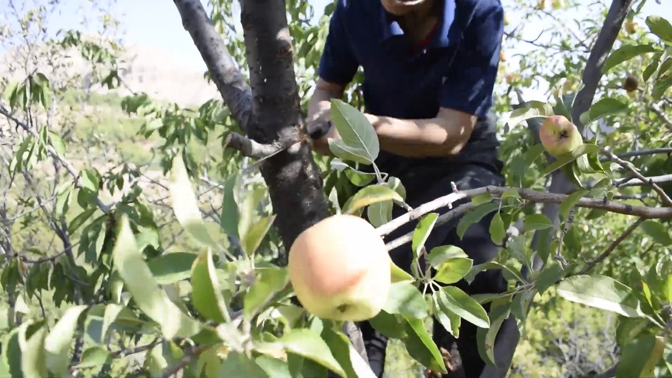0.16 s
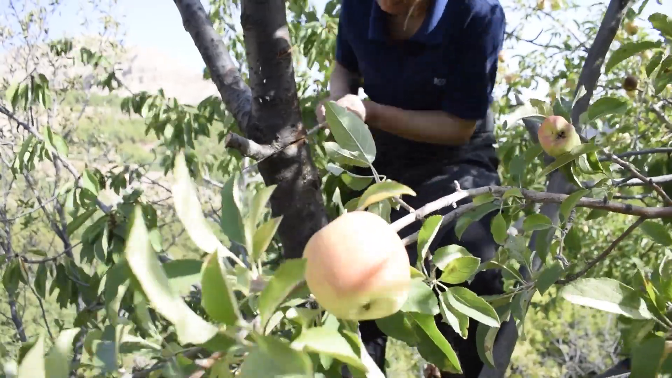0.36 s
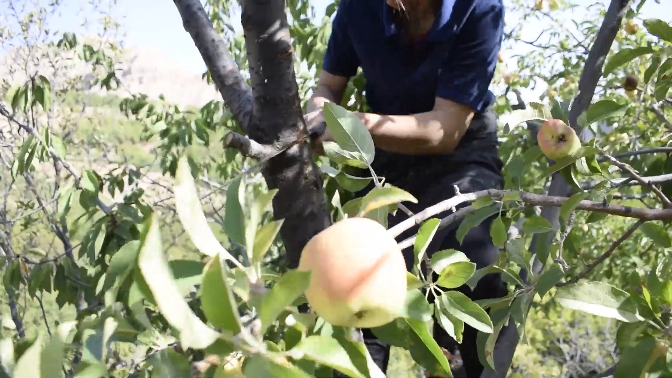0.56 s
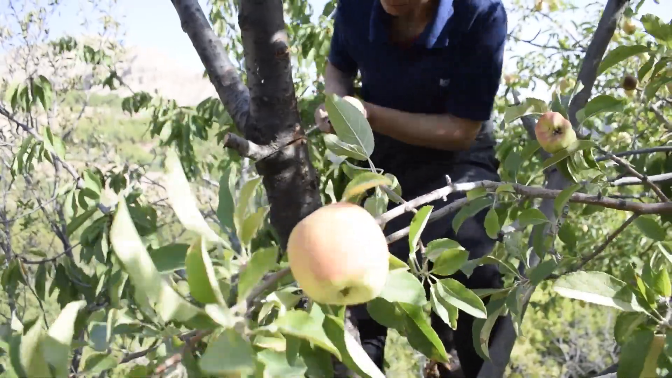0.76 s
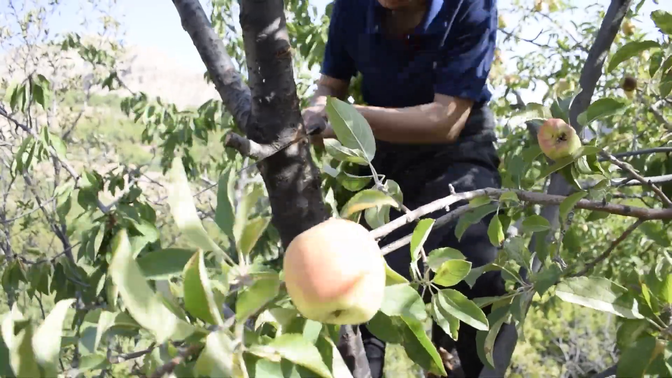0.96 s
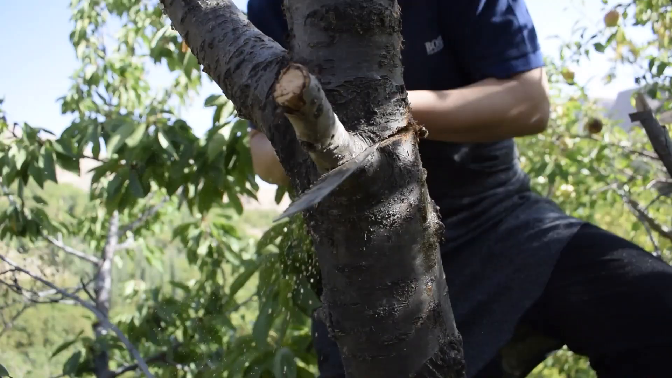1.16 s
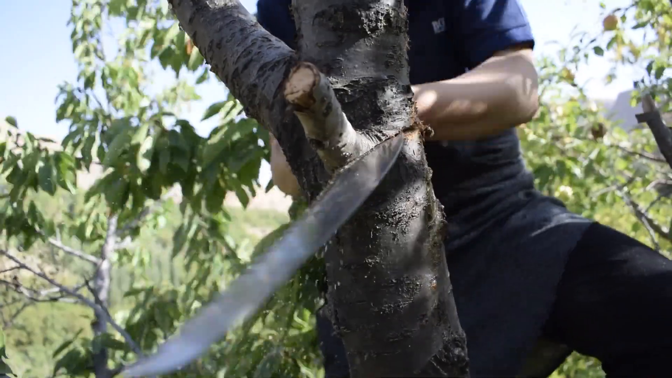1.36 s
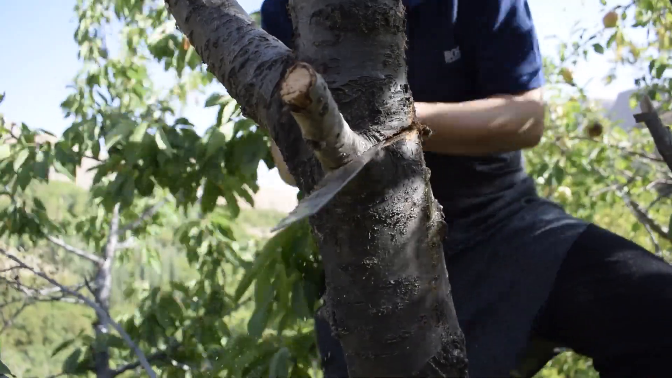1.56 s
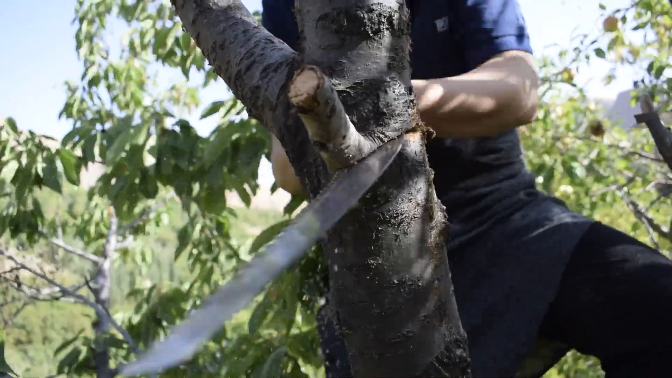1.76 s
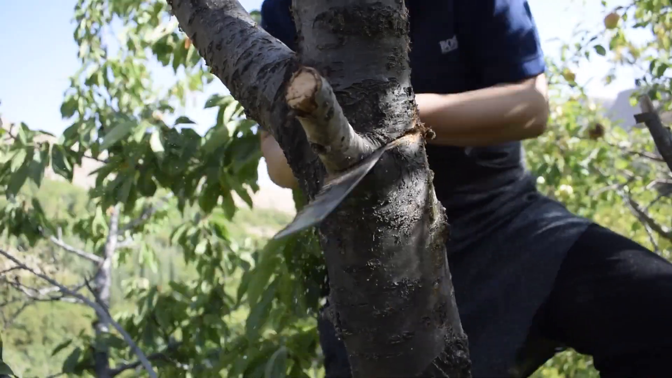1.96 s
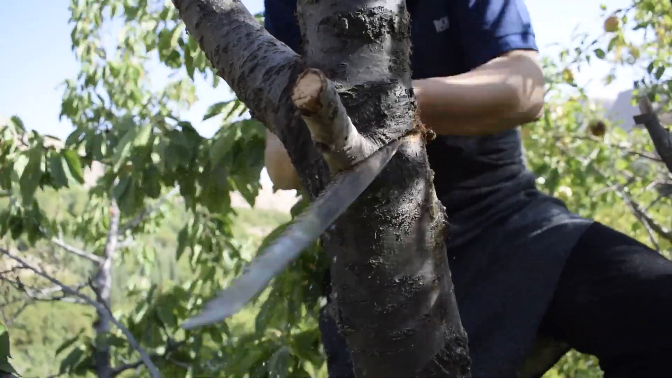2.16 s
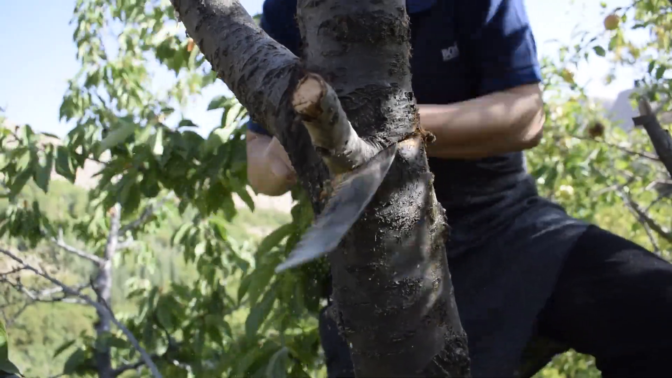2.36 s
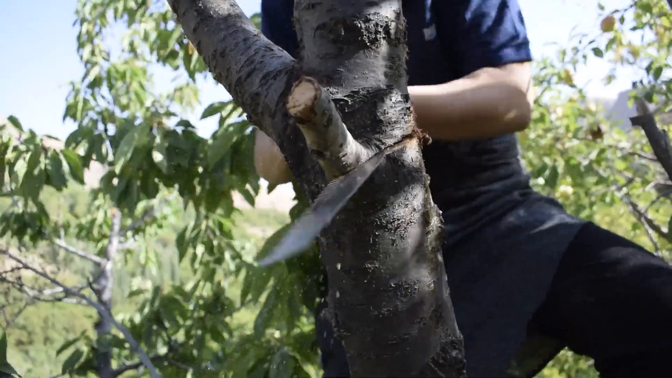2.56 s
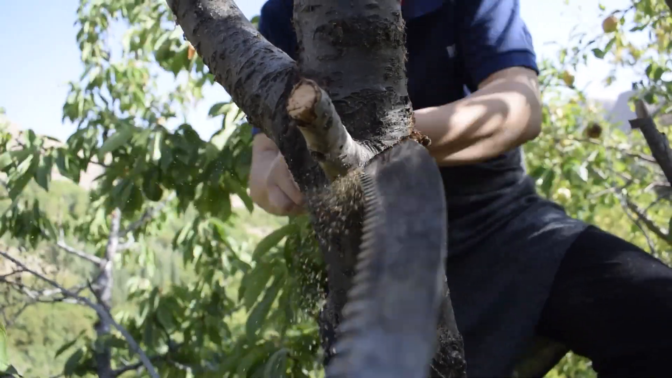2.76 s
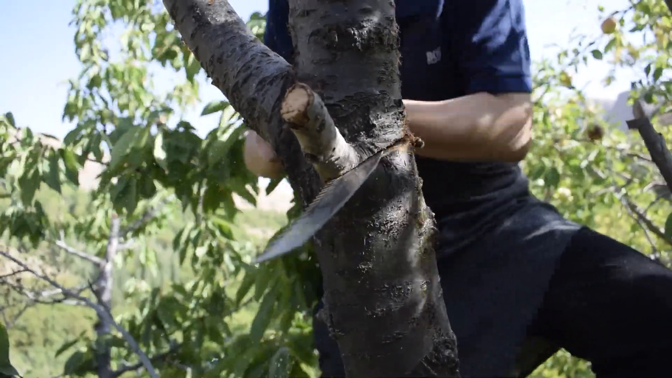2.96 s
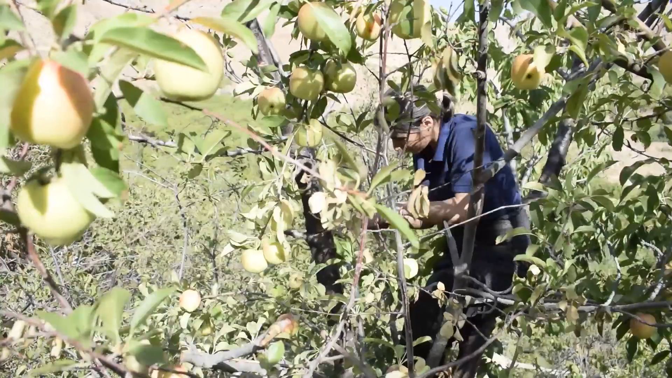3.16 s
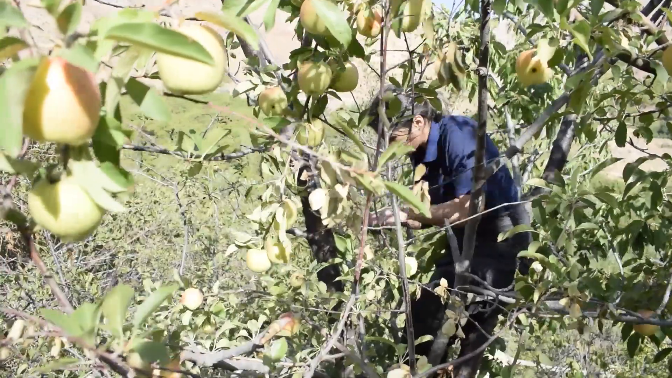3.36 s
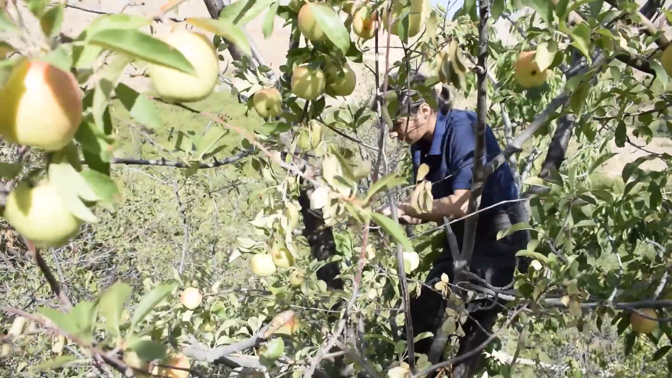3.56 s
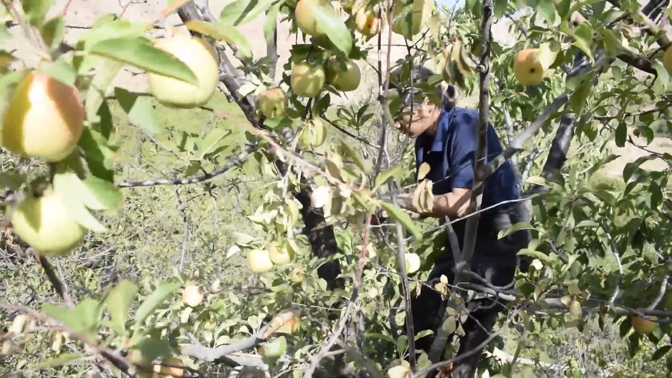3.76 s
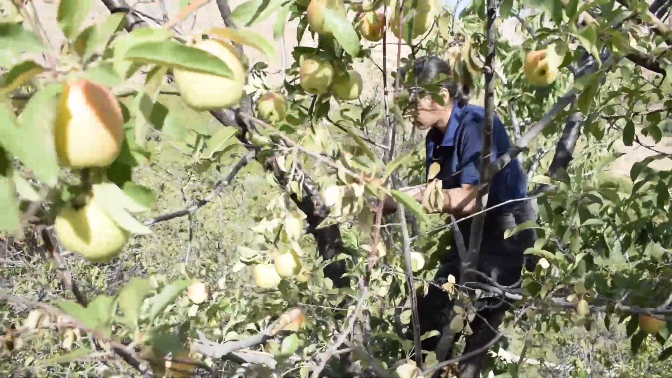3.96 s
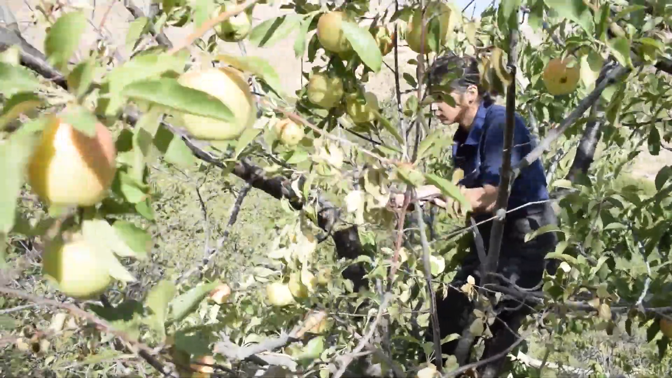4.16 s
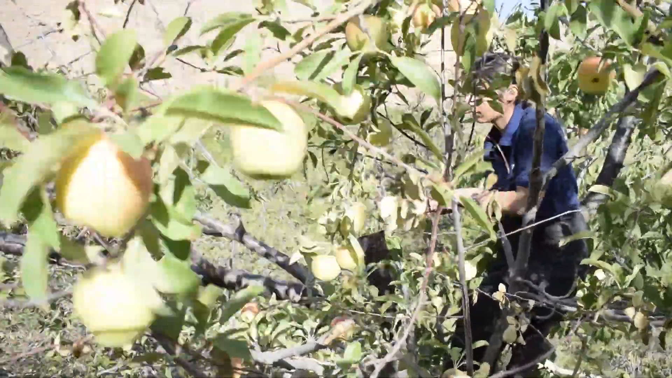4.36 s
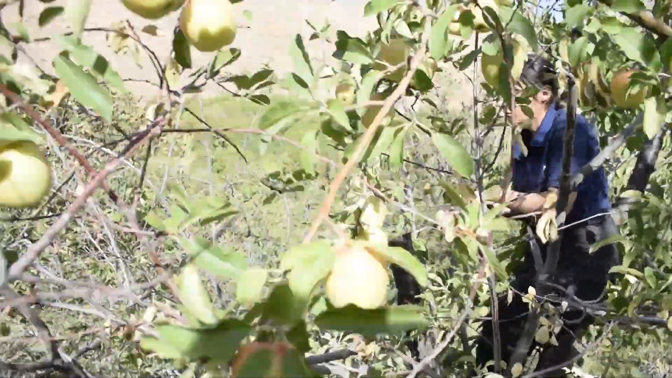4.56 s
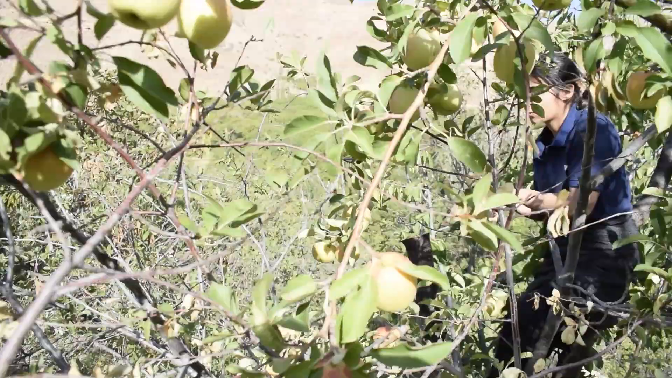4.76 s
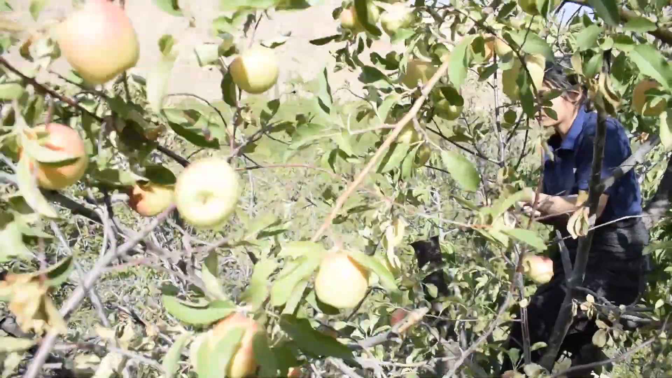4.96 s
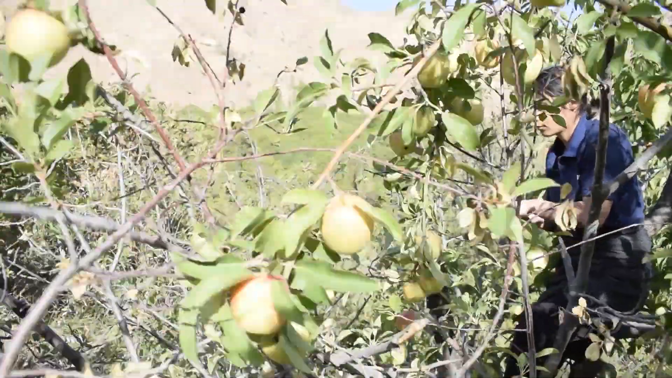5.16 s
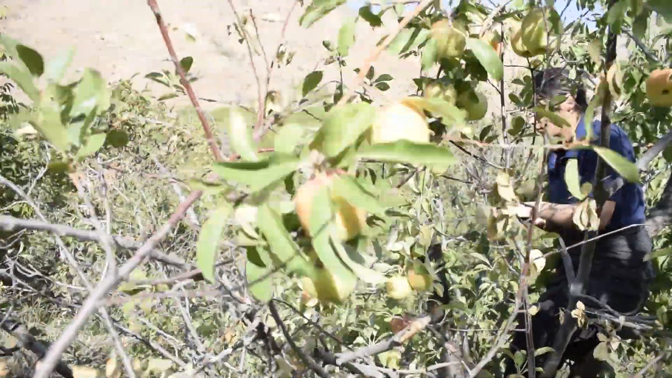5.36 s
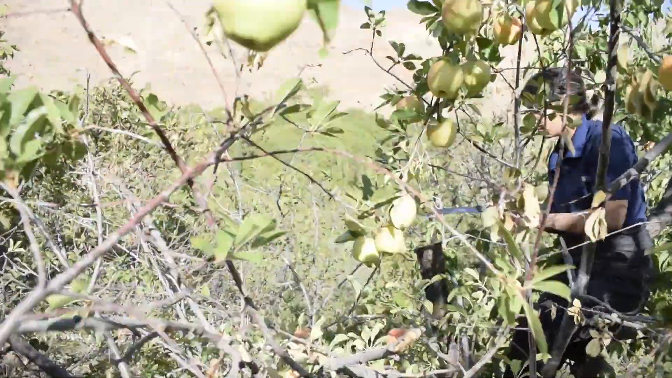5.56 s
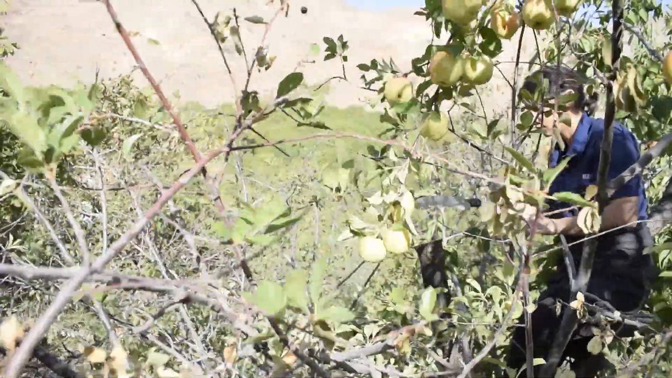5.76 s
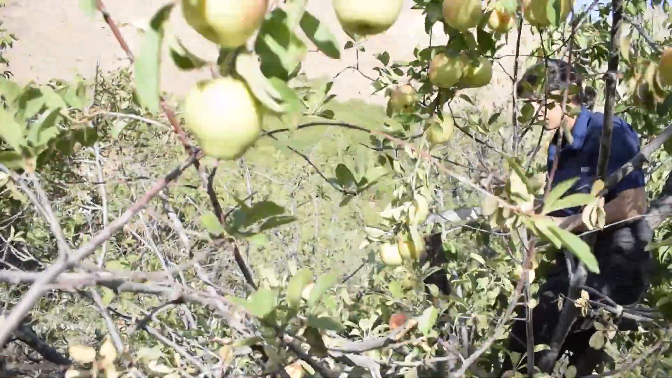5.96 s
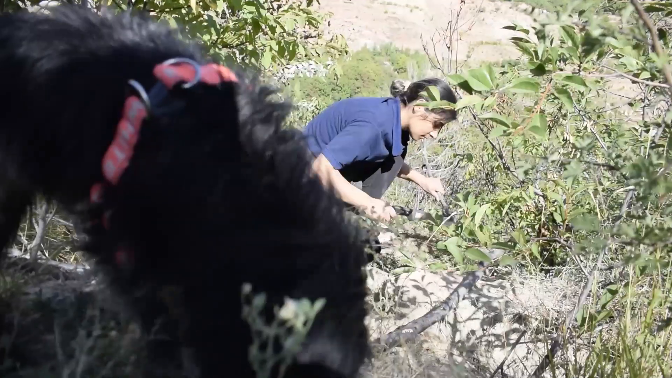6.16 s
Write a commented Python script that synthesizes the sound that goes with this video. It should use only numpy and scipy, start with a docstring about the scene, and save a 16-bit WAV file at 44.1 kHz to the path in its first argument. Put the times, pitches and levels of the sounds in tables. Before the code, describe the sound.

Outdoors in an orchard, a hand saw works close to the microphone with fast push and pull strokes, hissing and rasping over a woody limb resonance. After about three seconds the last fibres crack and tear, and the limb drops through foliage in bright, uneven waves of leaf rustle, twig snaps and scraping. The rustle dies away over a light breeze and a faint, distant engine putter.

```python
"""In an orchard, outdoors, a hand saw cuts a limb off a fruit tree in quick push and pull strokes.
Each stroke is random tooth bites and clicks of torn fibre, filtered into blade hiss, rasp and limb resonance.
Short bursts of clicks make the last fibres crack; then filtered clicks, flicks and noise rustle and scrape
as the limb sweeps down through the leaves. Noise makes a light breeze, with a faint low drone early on.
Later a slow engine putters far off: one soft puff for each firing."""
import sys
import numpy as np
from scipy import signal
from scipy.io import wavfile
from scipy.ndimage import uniform_filter1d, map_coordinates

SR = 44100
rng = np.random.default_rng(int(sys.argv[2]) if len(sys.argv) > 2 else 0)


def transcribe(signal):
    """Save signal, clipped to [-1, 1], as a 16-bit WAV file at the path in sys.argv[1]."""
    frames = np.atleast_2d(signal).T
    limited = np.clip(frames, -1, 1)
    pcm = np.round(limited * 32767).astype(np.int16)
    wavfile.write(sys.argv[1], SR, pcm)


N = 273420
TIME = np.arange(N) / SR  # seconds


def gain_of(db):
    """Turns decibels into a factor for the amplitude."""
    return 10 ** (np.asarray(db) / 20)


def evened(x):
    """Scales a sound to an average strength (rms) of 1."""
    return x / np.sqrt(np.mean(x ** 2) + 1e-20)


def add(mix, start_s, sound):
    """Mixes a sound in at its start time."""
    part = mix[max(round(start_s * SR), 0):][:len(sound)]
    part += sound[:len(part)]


def follow(rows, t):
    """Reads each column of a time curve at the times t, with straight lines between rows."""
    times, *columns = np.transpose(rows)
    return [np.interp(t, times, column) for column in columns]


def colour(x, points):
    """Filters to a given spectrum, never ahead of the input, so clicks keep their sharp fronts."""
    hz, db = np.transpose(points)
    f = abs(np.fft.fftfreq(4096, 1 / SR))
    level_db = np.interp(np.log(f + 1), np.log(hz + 1), db)
    log_gain = np.log(gain_of(level_db))
    # the phase that packs the filter's energy as early as possible
    taps = np.fft.ifft(np.exp(np.conj(signal.hilbert(log_gain)))).real
    first_half = taps[:len(taps) // 2]
    return evened(signal.oaconvolve(x, first_half)[:len(x)])


def ring(x, hz, width_hz):
    """Passes a sound through one resonance; a narrow one rings longer."""
    hz = min(hz, .45 * SR)
    width_hz = min(max(width_hz, 1), SR / 4)
    return signal.lfilter(*signal.iirpeak(hz, hz / width_hz, fs=SR), x)


def body(x, modes, size=1):
    """Adds resonances side by side, each applied twice for steep sides; size multiplies their pitch."""
    total = 0
    for hz, width_hz, db in modes:
        once = ring(x, hz * size, width_hz)
        twice = ring(once, hz * size, width_hz)
        total = total + gain_of(db) * evened(twice)
    return evened(total)


def glide(x, hz, width_hz):
    """Feeds a steep resonance that follows the pitch curve hz."""
    turn = np.exp(2j * np.pi * np.cumsum(hz) / SR)
    r = np.exp(-np.pi * width_hz / SR)
    # shift the moving pitch down to zero, smooth, and shift it back up
    smoothed = signal.lfilter([1], [1, -2 * r, r * r], x / turn)
    return evened((turn * smoothed).real)


def wander(count, hz):
    """Drifts between random values, hz of them a second, with rms 1."""
    knots = np.arange(count) * hz / SR
    values = rng.standard_normal(int(knots[-1]) + 2)
    return evened(map_coordinates(values, [knots], order=1))


def crackle(count, per_s, spread_db):
    """Scatters random clicks of either sign; a larger spread makes their strengths more unequal."""
    draw = rng.random(count) * SR / per_s
    hit = draw < 1
    luck = 2 * draw[hit] - 1
    strength = gain_of(spread_db * np.minimum(-np.log(abs(luck)), 5))
    clicks = np.zeros(count)
    clicks[hit] = np.sign(luck) * strength
    return evened(clicks)


def air():
    """A light breeze in the trees is slowly varying filtered noise; the faint low drone is a wavering sine."""
    # the breeze's spectrum: pitch_hz, level_db (relative, per Hz)
    breeze_spectrum = [(15, -40), (25, -24), (317, -6), (503, -6.5), (818, -10), (1370, -13), (1560, -13),
                       (1740, -13), (1940, -18), (4610, -15.5), (5730, -14.5), (8140, -16.5), (9070, -22.5),
                       (16000, -26.5)]
    # the breeze's loudness: time_s, level_db
    breeze_level = [(0, -43), (1.1, -44.5), (2.0, -39), (3.0, -42), (3.6, -45), (4.5, -46.5), (6.2, -48)]
    # the drone's loudness: time_s, level_db
    drone_level = [(0, -60.5), (1.1, -61.5), (1.2, -87)]
    breeze_db = follow(breeze_level, TIME)[0] + 1.04 * wander(N, 4.08)
    breeze = gain_of(breeze_db) * colour(rng.standard_normal(N), breeze_spectrum)
    drone_hz = 65 + 0.34 * wander(N, 7.7)
    drone = np.sin(2 * np.pi * np.cumsum(drone_hz) / SR)
    return breeze + gain_of(follow(drone_level, TIME)[0]) * evened(drone)


def engine():
    """Each firing of the distant engine gives one soft puff, coloured by the exhaust's resonances."""
    # the engine's course: time_s, firings_per_s, level_db
    running = [(3.18, 22.07, -53.5), (3.635, 22.4, -55), (4.1, 19.7, -47), (4.5, 23.7, -68.5),
               (5.0, 21, -56), (5.58, 23.2, -53), (6.2, 19.96, -49.5)]
    # exhaust resonances: pitch_hz, width_hz, level_db (relative)
    exhaust = [(142, 48, 2.5), (284, 83, 4), (450, 71, -0.5)]
    rate, db = follow(running, TIME)
    firings = np.cumsum(rate * (TIME > running[0][0])) / SR
    puffs = np.diff(np.ceil(firings), prepend=0) * gain_of(rng.standard_normal(N))
    breath = .25 * rng.standard_normal(N)
    return gain_of(db) * body(evened(puffs) + breath, exhaust)


def orchard(x, t60_s, wet_db):
    """Trunks and foliage scatter a short, dull tail; it fades by 60 dB in t60_s."""
    t = np.arange(SR // 2) / SR
    echoes = crackle(len(t), per_s=2500, spread_db=-3.5) * gain_of(-60 * t / t60_s) * (t > .004)
    tail = ring(echoes, 1400, 11000)
    tail = tail / np.linalg.norm(tail)
    return x + gain_of(wet_db) * signal.oaconvolve(x, tail)[:N]


def flicks(per_s, spread_db, lowest_hz, highest_hz, count=8):
    """Single leaves and twigs flick, each group with a short ring of its own pitch."""
    pitches = np.geomspace(lowest_hz, highest_hz, count)  # from broad leaves to thin tips
    # a flick is a tiny scrape, not a single click
    t = np.arange(SR // 400) / SR
    scrapes = rng.standard_normal((count, len(t))) * np.exp(-t / 0.00042)
    total = 0
    for hz, scrape in zip(pitches, scrapes):
        train = signal.oaconvolve(crackle(N, per_s / count, spread_db), scrape)[:N]
        total = total + np.sqrt(hz) * evened(ring(train, hz, 0.32 * hz))
    return evened(total)


def fall():
    """The limb falls: leaves flick past each other in clumps while twigs and boughs scrape."""
    # the fall through foliage: time_s, leaf_rustle_db, twig_scrape_db, bough_rubbing_db
    falling = [(3.765, -52, -47, -55), (3.8, -27.5, -30.0, -40.0), (3.865, -43, -32, -38.5),
               (3.9, -61, -33.0, -35), (4.05, -36, -37, -44), (4.3, -24, -26.5, -39),
               (4.47, -22.5, -25.5, -44), (4.61, -31, -36, -61), (4.68, -24, -29, -40),
               (4.77, -36.0, -34, -46.5), (4.81, -20, -28, -42), (4.94, -29, -30.5, -41),
               (5.01, -14.5, -28.0, -37.5), (5.05, -21.5, -21, -30.5), (5.11, -23.0, -32, -40),
               (5.32, -16, -30, -46.5), (5.43, -32, -37, -48.5), (5.75, -45.0, -47, -53),
               (6.2, -54, -53, -60)]
    # spectra of the three layers: pitch_hz, level_db (relative, per Hz)
    leaf_spectrum = [(3000, -47), (4800, -8.5), (6200, 0), (7400, 1.5), (8900, 4), (11000, -7), (12700, -5),
                     (14700, -5), (16000, -12)]
    twig_spectrum = [(1100, -33), (1800, -4), (2450, 2.5), (3600, 1), (5200, 2), (7000, -6), (9100, -11),
                     (15000, -37)]
    bough_spectrum = [(210, -76), (350, -8), (539, -7.5), (752, -1.5), (930, -3.5), (1110, 0.5),
                      (1900, -2.5), (2470, -70), (4180, -120)]
    leaf_db, twig_db, bough_db = follow(falling, TIME)
    clumps = evened(gain_of(2.6 * wander(N, 130)))
    ticks = crackle(N, per_s=350, spread_db=2.9)  # shared by all three layers
    leaves = 1.04 * ticks + flicks(7000, 3.7, 4100, 14700) + .5 * rng.standard_normal(N)
    twigs = 0.4 * ticks + 0.36 * flicks(1800, 3.2, 1470, 7500) + .5 * rng.standard_normal(N)
    bough = 0.33 * ticks + 0.36 * flicks(1000, 0.93, 570, 2150) + 0.41 * rng.standard_normal(N)
    sound = gain_of(leaf_db) * colour(leaves, leaf_spectrum)
    sound = sound + gain_of(twig_db) * colour(twigs, twig_spectrum)
    sound = sound + gain_of(bough_db) * colour(bough, bough_spectrum)
    return clumps * sound * (TIME > falling[0][0])


def knock(start_s, db, hz):
    """A dull blow on green wood: a dying burst of noise through two heavily damped resonances."""
    t = np.arange(SR // 10) / SR
    blow = rng.standard_normal(len(t)) * np.exp(-t / 0.0083)
    sound = ring(ring(blow, hz, 0.51 * hz), hz, 2.0 * hz)
    return start_s, gain_of(db - 8.0) * sound / abs(sound).max()


def groan(start_s, end_s, db, first_hz, last_hz, width_hz):
    """Wood, or the saw blade, sticks and slips; the slips feed one gliding resonance."""
    count = max(round((end_s - start_s) * SR), SR // 100)
    slips = crackle(count, per_s=2500, spread_db=-0.7)
    uneven = 1 + .05 * wander(count, 90)
    tone = glide(slips, np.linspace(first_hz, last_hz, count) * uneven, width_hz)
    tone = tone * gain_of(2.5 * wander(count, 200))
    return start_s, gain_of(db) * evened(tone * signal.windows.tukey(count, .6))


def tear():
    """The last strip of wood peels apart with a dry crackle that swells as the limb sags."""
    # when the strip tears and how loudly: start_s, end_s, level_db (midway)
    start_s, end_s, db = (3.362, 3.482, -32.5)
    # spectrum of peeling fibres: pitch_hz, level_db (relative, per Hz)
    peel_spectrum = [(500, -27), (1200, -6), (2500, -9), (5000, 3), (9000, 1), (11000, -14), (16000, -19)]
    swell_db = 3  # rise from start to end
    count = round((end_s - start_s) * SR)
    swell = gain_of(db + swell_db * np.linspace(-.5, .5, count)) * signal.windows.tukey(count, .35)
    return start_s, swell * colour(crackle(count, per_s=10000, spread_db=3.0), peel_spectrum)


def snap(start_s, db, hz, knock_db):
    """A bundle of fibres breaks within milliseconds, splinters trail off, and the wood rings."""
    # what snapping wood rings with: pitch_hz (before a random change of size), width_hz, level_db (relative)
    snap_wood = [(640, 200, -14), (1050, 170, -7), (1314, 370, 4), (1645, 270, 3), (2160, 630, 5.5),
                 (2800, 760, 2.5)]
    t = np.arange(SR // 12) / SR
    first_fibre = 2 * np.exp(-t / .0004)
    breaking = first_fibre + np.exp(-t / 0.0034) + gain_of(-11.0) * np.exp(-t / 0.02)
    burst = crackle(len(t), per_s=11000, spread_db=-0.2) * breaking
    # thin, dry fibres break the most brightly
    splinters = (hz / 8000) ** 2 * 0.62 * evened(ring(burst, 18400, 5000))
    crack = evened(ring(burst, hz, 0.29 * hz)) + splinters
    wood = body(burst, snap_wood, size=rng.uniform(0.92, 1.114))
    sound = crack + gain_of(knock_db + 7) * wood
    return start_s, gain_of(db - 23.5) * evened(sound)


def fibres(length, lowest_hz, highest_hz, count=7):
    """Bundles of fibres of different sizes take turns under the teeth, each rasping at its own pitch."""
    pitches = np.geomspace(lowest_hz, highest_hz, count) * rng.uniform(.92, 1.08, count)
    total = 0
    for hz in pitches:
        clicks = crackle(length, per_s=4000, spread_db=1.8)
        bundle = glide(clicks, hz * (1 + .05 * wander(length, 30)), 900)
        total = total + bundle * gain_of(4 * wander(length, 70))
    return evened(total)


def blade_speed(t, bite_s, hold_s, attack_s, release_s):
    """The arm speeds the blade up from rest, holds it, and slows it for the turn (0-1)."""
    return np.interp(t - bite_s, [-attack_s, 0, hold_s, hold_s + release_s], [0, 1, 1, 0])


def teeth(speed, per_s, uneven, release_s, drag):
    """Teeth catch at uneven intervals; the force of each bite dies quickly over a steady drag."""
    count = len(speed)
    # per_s is the typical bite rate at a speed of 1
    passed = np.cumsum(per_s * speed * np.exp(uneven * wander(count, 400))) / SR
    bites = np.diff(np.floor(passed), prepend=0) * gain_of(5.3 * rng.standard_normal(count))
    force = signal.lfilter([1], [1, -np.exp(-1 / (release_s * SR))], bites)
    force = drag + evened(force)
    # the arm pushes steadily, so the bites share its work
    return bites, force / np.sqrt(uniform_filter1d(force ** 2, size=800))


def stroke(bite_s, hold_s, attack_s, release_s, hiss_db, rasp_db, limb_db, lean_db, build_db):
    """One pass of the blade: bites tear bursts of fibres and shake the limb, louder with speed and pressure."""
    # spectra of the blade's hiss and of the slot it cuts: pitch_hz, level_db (relative, per Hz)
    blade_spectrum = [(3600, -58), (4400, -9), (5100, -5.5), (5800, -1.5), (6500, -1.5), (7500, 2),
                      (8600, 3.5), (9600, -1.5), (11100, -8), (12500, -2.5), (13800, 0), (15200, 1),
                      (16000, -17)]
    slot_spectrum = [(900, -16), (1400, -7.5), (1650, -10.5), (1950, -4.5), (2300, -2), (2700, -4.5),
                     (3300, 1.5), (4300, 2.5), (5400, 8), (7000, -8), (11000, -32)]
    # the limb's resonances in turn: before change_s, until loose_s, and after: pitch_hz, width_hz, level_db
    # (relative)
    limb_early = [(221, 22, -9.5), (440, 230, 5), (740, 125, 6.5), (1003, 240, 8.5)]
    limb_later = [(183, 24, -3), (343, 170, 8), (707, 410, 9), (940, 830, 8.5)]
    limb_loose = [(560, 140, -6), (750, 260, 0), (1100, 140, -0.5)]
    change_s, loose_s = 1.18, 3.17  # when the limb's resonances change, and when the limb hangs loose
    # how far each layer drops when the blade comes to rest for the turn
    hiss_drop_db, rasp_drop_db, limb_drop_db = 44, 38, 26.5
    rasp_per_pressure = 1.24  # dB of rasp for each dB of pressure

    t = np.arange(max(bite_s - attack_s, 0), bite_s + hold_s + release_s, 1 / SR)
    speed = blade_speed(t, bite_s, hold_s, attack_s, release_s)
    slowing = 1 - speed
    travel = np.interp(t - bite_s, [0, hold_s], [-.5, .5])
    hiss_db = hiss_db - hiss_drop_db * slowing + lean_db * travel
    rasp_db = rasp_db - rasp_drop_db * slowing + rasp_per_pressure * lean_db * travel
    limb_db = limb_db - limb_drop_db * slowing + build_db * travel

    bites, force = teeth(.4 + speed, per_s=220, uneven=.5, release_s=0.0055, drag=0.78)
    tearing = force * crackle(len(t), per_s=16000, spread_db=2.0)
    hiss = colour(tearing + 0.79 * force * fibres(len(t), 5140, 13800), blade_spectrum)
    # light strokes lack the finest, brightest splinters
    high_pass = signal.butter(6, 9800, "high", fs=SR, output="sos")
    top = signal.sosfiltfilt(high_pass, hiss)
    hiss = hiss + top * (gain_of(np.clip(0.23 * (hiss_db + 21), -6, 1)) - 1)

    grit = crackle(len(t), per_s=5000, spread_db=0.5) + 1.56 * fibres(len(t), 1625, 4440)
    scraping = force * grit
    # the slot rings lower from change_s on
    slot_hz, slot_width_hz = (3250, 700) if bite_s < change_s else (2145, 370)
    slot = ring(scraping, slot_hz, slot_width_hz)
    rasp = evened(colour(scraping, slot_spectrum) + 0.22 * evened(slot))

    if bite_s < change_s:
        modes = limb_early
    elif bite_s < loose_s:
        modes = limb_later
    else:
        modes = limb_loose
    limb = body(0.75 * evened(bites) + tearing, modes)
    sound = gain_of(hiss_db) * hiss + gain_of(rasp_db) * rasp + gain_of(limb_db) * limb
    return t[0], sound * signal.windows.tukey(len(t), .04)


def scene():
    """Sawing, breaking and falling, over the sounds of the orchard."""
    # dull knocks of the saw and the limb: start_s, level_db (relative), pitch_hz (centre)
    knocks = [(.446, -22.5, 748), (1.198, -11, 1900), (1.795, -42, 80), (2.087, -8.5, 320),
              (2.088, -27, 70), (2.829, -12.5, 2050), (2.171, -34, 65), (2.205, -29, 150), (2.478, -33, 85),
              (2.873, -14.5, 231), (4.148, -11.5, 633), (4.852, -19, 1510), (5.477, -18, 390),
              (5.871, -22, 1571)]
    # wood rubbing, scraping and groaning, and a brief squeak of the saw blade at 1.43 s: start_s, end_s,
    # level_db, first_hz, last_hz, width_hz
    groans = [(0.352, 0.405, -25.5, 467, 346, 90), (0.724, 0.77, -27.5, 753, 670, 90),
              (1.068, 1.137, -28.5, 490, 340, 87), (1.43, 1.485, -33.5, 1400, 1460, 200),
              (1.485, 1.564, -36, 514, 294, 110), (1.646, 1.707, -41, 480, 407, 110),
              (1.865, 1.944, -32.5, 400, 300, 110), (3.226, 3.318, -33, 860, 580, 200),
              (3.361, 3.48, -35, 1080, 1140, 259), (4.268, 4.433, -36.5, 726, 830, 250),
              (4.298, 4.503, -24, 5650, 6200, 2600)]
    # fibres and twigs snapping: start_s, level_db (relative), pitch_hz (centre), wood_knock_db (relative)
    snaps = [(1.124, -11, 7530, 0), (2.999, -9, 6800, -40), (3.235, -9, 8460, -30),
             (3.36, -4.5, 8340, -5.5), (3.442, -6.5, 5200, -28), (3.485, -8.5, 8550, -15),
             (3.491, -2, 8260, -7.5), (3.644, -2, 8700, -7.5), (3.859, -12, 4030, -34),
             (3.93, -7, 3070, -10), (4.15, -9, 3800, -19), (4.198, -2.5, 9400, -45),
             (4.228, -7.5, 6340, -34), (4.287, -3.5, 5270, -31), (4.327, -2.5, 5470, -18.5),
             (4.385, -3, 5140, -35), (4.457, 0, 6200, -28), (4.471, 4, 5530, -39), (4.501, 0.5, 8700, -52),
             (4.54, 1.5, 6460, -12), (4.552, -3, 5960, -40), (4.644, -3.5, 7240, -26),
             (4.678, -2.5, 3130, -17), (4.708, -9.5, 2860, -21), (4.796, -6.5, 8890, -22),
             (4.831, -5.5, 5770, -38), (4.852, -4.5, 5350, -12), (5.041, -5.5, 6580, -14),
             (5.34, -6.5, 7850, -19), (5.742, -16.5, 6960, -23), (6.024, -23, 7500, -27)]
    # push and pull strokes in turn: bite_s (when the teeth bite fully), hold_s, attack_s, release_s,
    # blade_hiss_db, cut_rasp_db, limb_resonance_db,
    # lean_db (pressure gained over the hold), build_db (limb's build-up over the hold)
    strokes = [(0.0, 0.013, 0.02, 0.065, -17.5, -25, -21.5, -4.5, -3.5),
               (0.146, 0.053, 0.098, 0.067, -28.5, -35.5, -49, 4, 6),
               (0.289, 0.1, 0.046, 0.057, -21.0, -26.5, -32.5, 12.0, 20.5),
               (0.524, 0.037, 0.089, 0.055, -21.5, -25.5, -36.5, 0, 6),
               (0.652, 0.1, 0.049, 0.042, -20.0, -25, -30, 3.5, 13.5),
               (0.876, 0.047, 0.11, 0.062, -26, -33, -47.5, 0, 5),
               (1.065, 0.064, 0.108, 0.023, -16.5, -21.5, -29, 1, 8),
               (1.248, 0.06, 0.1, 0.047, -19, -27, -36, 11, -3.5),
               (1.439, 0.078, 0.041, 0.063, -15.0, -27.5, -30.5, 1.5, 2.5),
               (1.622, 0.061, 0.05, 0.046, -16.0, -21, -32.0, 4, 6.5),
               (1.805, 0.096, 0.03, 0.07, -14.5, -25.5, -32.5, 3.5, 23),
               (2.02, 0.059, 0.077, 0.05, -15.0, -23.0, -33, 1, 6),
               (2.204, 0.086, 0.07, 0.095, -15.0, -31.5, -37.5, -6, 4),
               (2.395, 0.056, 0.059, 0.042, -14, -23.0, -38.5, 2.5, 3),
               (2.546, 0.071, 0.062, 0.074, -14, -28.5, -36, 1.0, 5.0),
               (2.732, 0.053, 0.045, 0.062, -16, -22, -37.5, 6, 3.5),
               (2.878, 0.075, 0.038, 0.079, -17, -35, -35.5, 12, 2.0),
               (3.101, 0.035, 0.045, 0.063, -16, -19, -35.0, 3.5, -2.5),
               (3.237, 0.062, 0.1, 0.066, -24, -28.5, -32, -10.5, -6.5)]
    tree = fall()
    add(tree, *tear())
    for source, table in (knock, knocks), (groan, groans), (snap, snaps), (stroke, strokes):
        for row in table:
            add(tree, *source(*row))
    return (air() + engine() + orchard(tree, t60_s=0.064, wet_db=-18.5))[None]


def record(dry):
    """Rounds off the highest peaks, then removes the treble above the band limit."""
    edge_hz = 16000
    limited = dry / (1 + dry ** 6) ** (1 / 6)
    low_pass = signal.firwin(511, edge_hz, window=("kaiser", 8), fs=SR)
    return signal.oaconvolve(limited, low_pass[None], "same")


dry = scene()
out = record(dry)
transcribe(out)
```